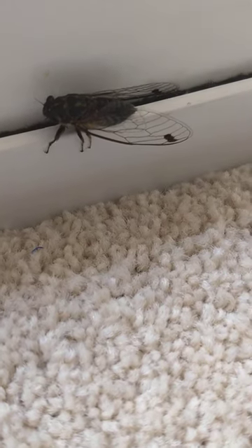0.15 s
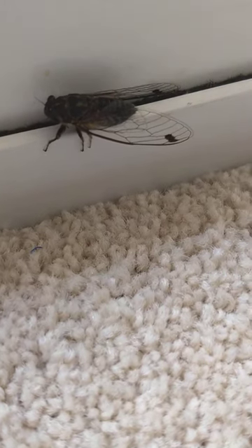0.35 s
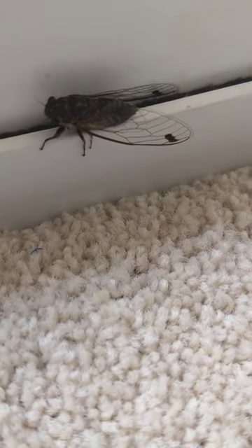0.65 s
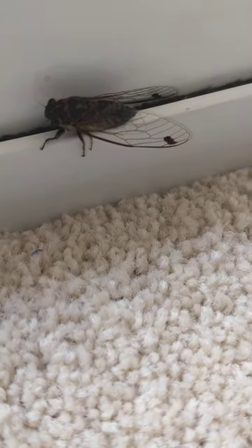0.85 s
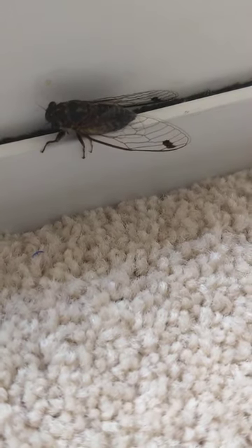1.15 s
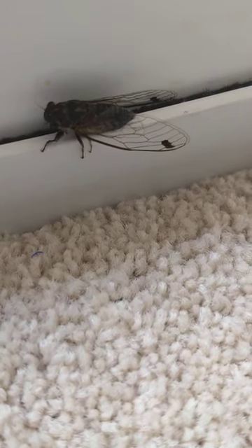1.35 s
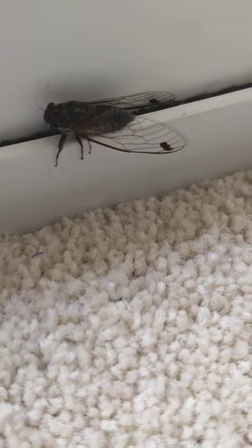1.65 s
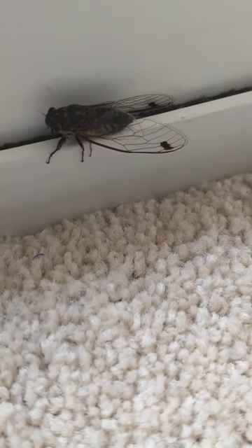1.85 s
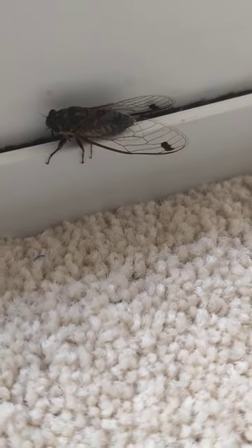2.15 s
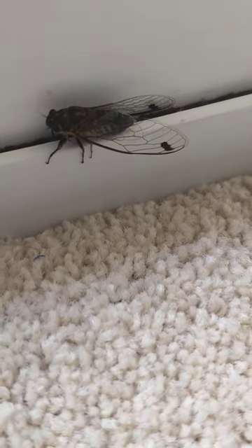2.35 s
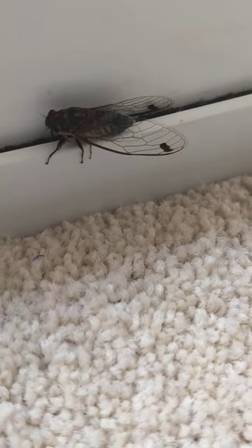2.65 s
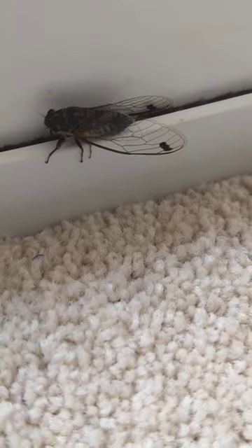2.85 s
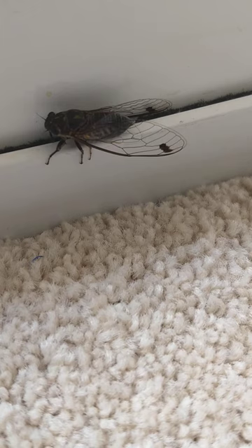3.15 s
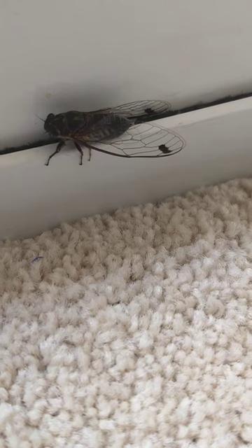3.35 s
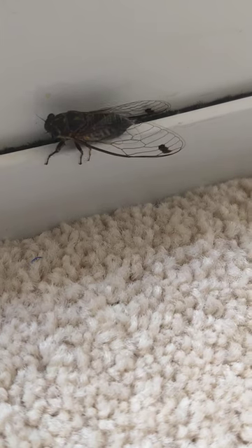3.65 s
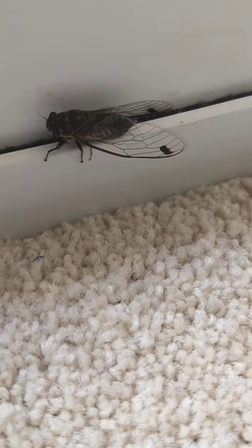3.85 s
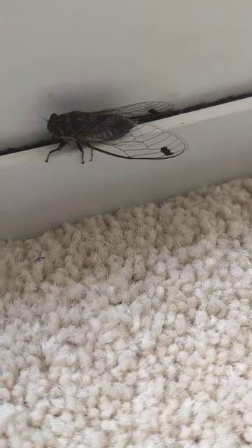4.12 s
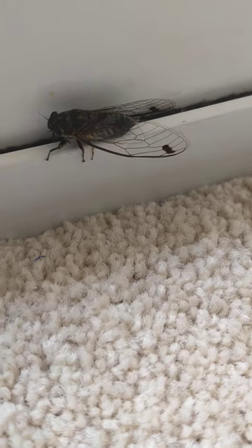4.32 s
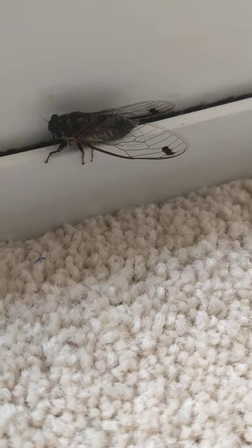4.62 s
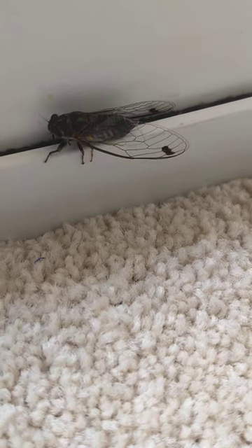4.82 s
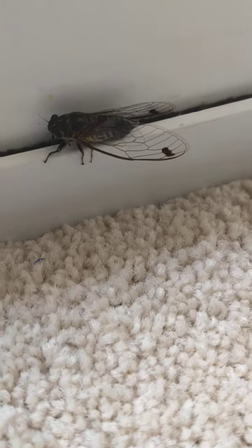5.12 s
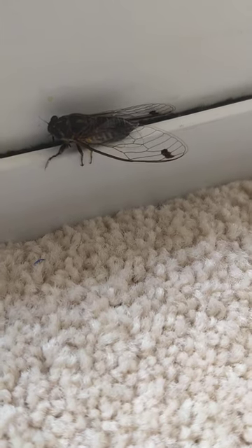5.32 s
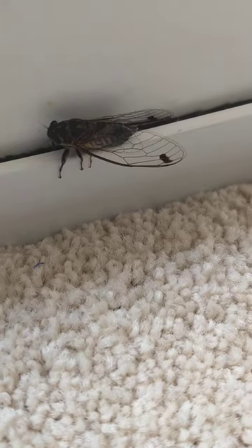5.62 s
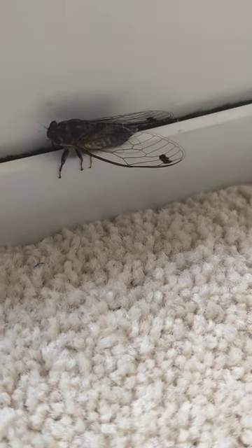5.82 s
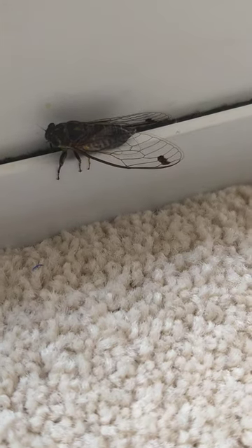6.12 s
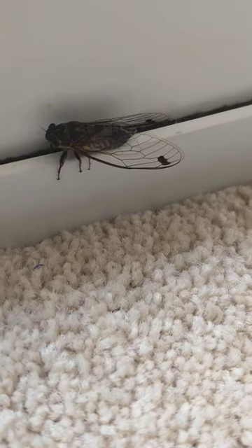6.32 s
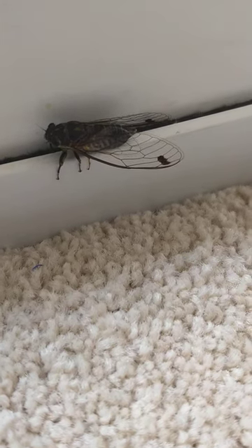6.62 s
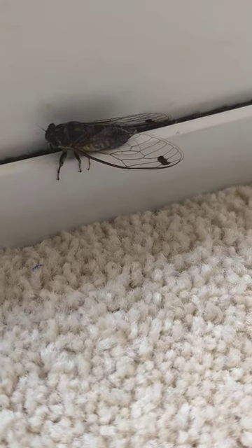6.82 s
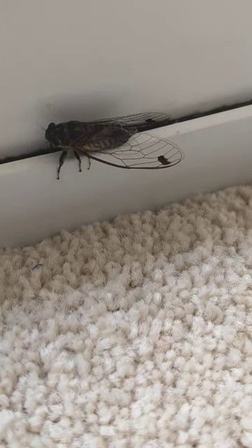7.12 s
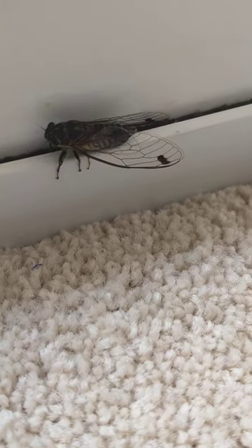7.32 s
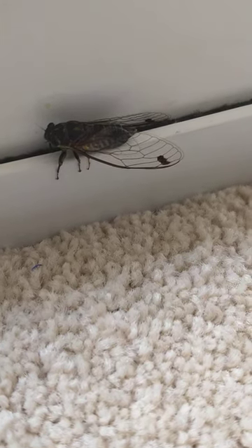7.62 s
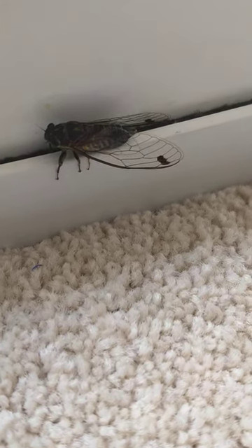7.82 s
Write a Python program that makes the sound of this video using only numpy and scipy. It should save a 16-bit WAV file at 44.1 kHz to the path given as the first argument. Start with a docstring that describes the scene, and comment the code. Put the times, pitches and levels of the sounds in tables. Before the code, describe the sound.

A single cicada sings very close to the microphone in a quiet carpeted room. It begins as a high, dry, slightly uneven rattle of rapid clicks, then gradually speeds up and grows louder, settling into a piercing, steady buzz that never pauses. Soft house noise and a faint hum lie behind it, with one soft low bump at the start and a brief, faint, distant whistle midway.

```python
"""A cicada sings on a skirting board in a quiet carpeted room, a hand's width from a two-port microphone.
Each muscle stroke buckles the ribs of its tymbals (two small drum skins), a click for each rib, and the
clicks ring its hollow abdomen. The strokes start slow and uneven, then grow faster, louder and steadier,
and a third pair of ribs joins in. Behind it are soft house noise, a hum, one bump and a far whistle."""
import sys
import numpy as np
from scipy import signal
from scipy.fft import rfft, irfft, next_fast_len
from scipy.io import wavfile
from scipy.ndimage import uniform_filter1d

SR = 44100
rng = np.random.default_rng(int(sys.argv[2]) if len(sys.argv) > 2 else 0)


def to_wav(sig):
    """Store sig (one row per channel, or 1-D mono) as 16-bit WAV at the path in sys.argv[1].

    Samples outside -1..1 are clipped; the rate is SR.
    """
    pcm = np.clip(np.atleast_2d(sig), -1, 1) * 32767
    pcm = np.round(pcm).astype(np.int16)
    wavfile.write(sys.argv[1], SR, pcm.T)  # frames by channels


N = 351477
TIME = np.arange(N) / SR
# the song's three paces: (slow [strokes/s], brisk [strokes/s], full [strokes/s])
PACES = [47, 68, 93]


def amp(db):
    """Turns decibels into a gain."""
    return 10 ** (np.asarray(db) / 20)


def unit(x):
    """Scales a signal to an average (rms) level of 1."""
    return x / np.sqrt(np.mean(x ** 2) + 1e-20)


def curve(rows, t):
    """Reads (time, value) rows at the times t."""
    return np.interp(t, *np.transpose(rows))


def spectrum(rows, hz):
    """Reads (frequency, value) rows on a log-frequency axis."""
    row_hz, value = np.transpose(rows)
    return np.interp(np.log(hz + 1), np.log(row_hz), value)


def prompt_response(gain):
    """The quickest response to a tap that has this gain at each frequency."""
    log_gain = np.log(np.maximum(np.r_[gain, gain[-2:0:-1]], 1e-5))
    return np.fft.ifft(np.exp(np.conj(signal.hilbert(log_gain)))).real


def clicks(times, sizes, reach=8):
    """Sharp taps, each at its exact time, even between samples."""
    at = np.floor(times * SR).astype(int)[:, None] + np.arange(-reach, reach + 1)
    offset = at - times[:, None] * SR
    shape = sizes[:, None] * np.sinc(offset) * np.cos(np.pi * offset / (2 * reach + 2)) ** 2
    inside = (at >= 0) & (at < N)
    return np.bincount(at[inside], shape[inside], N)


def room_tone(level_db=-52, rumble_hz=260, lean_db=1):
    """Soft noise of the house, partly alike at the two ports; its rumble leans to the left."""
    # colour of the noise: (frequency [Hz], relative level [dB])
    colour = [(28, -67), (40, -22), (49, 2.5), (60, -4), (78, 1.5), (105, -5), (220, -11), (420, -16.5),
              (760, -14.5), (1030, -13), (1250, -20), (1500, -22.5), (2700, -26.5), (4000, -41.5),
              (8000, -27), (12000, -74), (16000, -54)]
    # how alike the ports are: (frequency [Hz], likeness [1 = same, -1 = opposite])
    likeness = [(120, -0.16), (300, 0.43), (600, 0.86), (1050, 1), (1450, 0.87), (1900, -0.81),
                (2300, -1.055), (2700, -0.997), (3300, 1), (4500, 0.75), (6000, -0.0023)]
    # the rumble swells a little, then fades: (time [s], gain [dB])
    rumble_levels = [(0, -2), (2.5, -1.5), (5.7, -0.5), (7.97, -3.5)]
    size = next_fast_len(N)
    hz = np.fft.rfftfreq(size, 1 / SR)
    alike = np.clip(spectrum(likeness, hz), -1, 1)
    noise = rfft(rng.standard_normal((2, size))) * amp(spectrum(colour, hz))
    mid, side = noise * np.sqrt([1 + alike, 1 - alike])
    air = amp(level_db) * unit(irfft(np.array([mid + side, mid - side]), size)[:, :N])
    rumble = signal.sosfilt(signal.butter(2, rumble_hz, fs=SR, output="sos"), air)
    rumble_gain = amp(curve(rumble_levels, TIME) + np.array([[lean_db], [-lean_db]]))
    return air + rumble * (rumble_gain - 1)


def house_hum():
    """The house hums faintly with a few wavering tones."""
    # the tones: (pitch [Hz], level [dB])
    tones = [(76.3, -69), (266.7, -69), (311.1, -71.5)]
    hum = np.zeros((2, N))
    for hz, db in tones:
        drift = np.cumsum(rng.standard_normal((2, N)), axis=1) * 3 / np.sqrt(SR)
        hum += amp(db) * np.sqrt(2) * np.sin(2 * np.pi * hz * TIME + drift)
    return hum


def far_whistle(waver_hz=14):
    """A faint, far whistle whose wavering pitch rises and falls."""
    # its path: (time [s], pitch [Hz], level [dB])
    path = [(3.95, 740, -76), (4.0, 754, -57), (4.06, 780, -59), (4.13, 793, -50.5), (4.18, 810, -66),
            (4.24, 770, -85)]
    times, hz, db = np.transpose(path)
    waver = waver_hz * unit(uniform_filter1d(rng.standard_normal(N), 400))
    pitch = np.interp(TIME, times, hz) + waver
    loudness = amp(np.interp(TIME, times, db)) * (TIME > times[0]) * (TIME < times[-1])
    return loudness * np.sin(2 * np.pi * np.cumsum(pitch) / SR)


def soft_bump():
    """One soft bump: three low tones that swell and die quickly."""
    # the tones: (start [s], pitch [Hz], level [dB], decay [s])
    tones = [(0.226, 90, -45, 0.0099), (0.231, 129, -40.5, 0.0096), (0.24, 205, -50, 0.0073)]
    bump = np.zeros(N)
    for start, hz, db, decay in tones:
        age = np.maximum(TIME - start, 0)
        bump += amp(db) * 2 * age / decay * np.exp(-age / decay) * np.sin(2 * np.pi * hz * age)
    return bump


def high_hiss(song, level_db=-32.0, follow_s=0.002, enter_s=4.63, fade_s=0.11):
    """A faint, high hiss follows the song's loudness from about 4.6 s on."""
    # colour of the hiss: (frequency [Hz], relative level [dB])
    colour = [(11000, -70.5), (12300, -22), (13200, -4.5), (14300, 6), (15500, -1.5), (16200, 4)]
    step = 1 / (follow_s * SR)
    loudness = np.sqrt(abs(signal.lfilter([step], [1, step - 1], song ** 2)))
    size = next_fast_len(N)
    gain = amp(spectrum(colour, np.fft.rfftfreq(size, 1 / SR)))
    hiss = irfft(rfft(rng.standard_normal((2, size))) * gain, size)[:, :N]
    fade_in = np.clip((TIME - enter_s) / fade_s + .5, 0, 1)
    return amp(level_db) * loudness * fade_in * unit(hiss)


def faint_ticks(taps, hz, pitch_hz=4050, width_hz=1300):
    """A faint tick near 4 kHz comes with each click and does not grow as the song swells."""
    tick = prompt_response(1 / (1 + (2 * (hz - pitch_hz) / width_hz) ** 2))
    return signal.oaconvolve(taps, tick / abs(tick).max())[:N]


def reflections(sound, fade_s, level_db, gap_s=0.0018):
    """Dense echoes, different at each port, that die away by 60 dB in fade_s."""
    t = np.arange(SR // 4) / SR
    echoes = rng.standard_normal((2, len(t))) * np.exp(-np.log(1000) * t / fade_s) * (t > gap_s)
    echoes /= np.linalg.norm(echoes, axis=1, keepdims=True)
    return amp(level_db) * signal.fftconvolve(sound[None], echoes, axes=1)[:, :N]


def ports(song, lag_ms=.436):
    """The microphone's right port (opening) hears each click later than the left, and upside down."""
    # right port against left, for the cicada's direction: (frequency [Hz], gain [dB])
    right_colour = [(3500, 1), (4600, -2.5), (5500, 0), (6700, 3), (7500, -0.8), (8600, -3), (9800, -4),
                    (10600, -3.5), (11500, 0)]
    size = next_fast_len(N)
    hz = np.fft.rfftfreq(size, 1 / SR)
    delay = np.exp(-2j * np.pi * hz * lag_ms / 1000)
    left = rfft(song, size)
    right = -left * amp(spectrum(right_colour, hz)) * delay
    return irfft(np.array([left, right]), size)[:, :N]


def dry_snaps(taps, hz, level_db=-42.5, decay_s=0.00022):
    """Each buckling rib snaps with a tiny burst of noise."""
    # colour of a snap: (frequency [Hz], gain [dB])
    colour = [(2800, -18), (4500, 4), (7000, -9), (9000, 9), (11000, 13.5), (12500, 3.5), (15500, -4.5),
              (16500, -13)]
    loudness = signal.lfilter([1], [1, -np.exp(-1 / (decay_s * SR))], taps)
    bursts = loudness * rng.standard_normal((2, N))
    response = np.fft.fftshift(irfft(amp(level_db + spectrum(colour, hz))))
    return signal.oaconvolve(bursts, response[None], "same")


def abdomen(rib_clicks, hz, sac_db=2.5, sac_hz=8400, sac_width_hz=430, top_hz=12600):
    """The hollow abdomen rings up to top_hz; its air sac adds one narrow, piercing peak."""
    # colour of the abdomen: (frequency [Hz], gain [dB])
    colour = [(1800, -27.5), (3000, -3), (4300, 4.5), (5000, -2.5), (5800, 9.5), (6600, -1.5), (7300, 4),
              (8300, -2), (8850, -0.5), (9300, 1.5), (10000, 0.5), (10700, -1.5), (11400, -3), (13000, -11),
              (16000, 23)]
    sac = sac_db / (1 + (2 * (hz - sac_hz) / sac_width_hz) ** 2)
    ringing = signal.oaconvolve(rib_clicks, prompt_response(amp(spectrum(colour, hz) + sac)))[:N]
    return signal.sosfilt(signal.butter(6, top_hz, fs=SR, output="sos"), ringing)


def rib_chirps(times, sizes, ring_hz, length_s, glide_hz, skew=0.89, swell=1.2):
    """A rib swells, rings for a few cycles and dies; a positive glide lifts its pitch as it stiffens."""
    at = np.ceil(times * SR).astype(int)[:, None] + np.arange(128)
    age = at / SR - times[:, None]
    progress = np.clip(age / length_s[:, None], 0, 1)
    cycles = age * (ring_hz[:, None] + np.reshape(glide_hz, (-1, 1)) * (progress - 1) / 2)
    loudness = sizes[:, None] * abs(np.sin(np.pi * progress ** skew)) ** swell
    wave = loudness * np.sin(2 * np.pi * cycles)
    inside = (at >= 0) & (at < N)
    return np.bincount(at[inside], wave[inside], N)


def muscle_strokes(scatter_ms=.55, settle_pace=27, force_spread_db=.35):
    """The start, pace and strength of each muscle stroke: the faster, the steadier."""
    # the muscle's pace, which drives the song: (time [s], pace [strokes/s])
    stroke_rate = [(0.0, 47.6), (0.35, 44.8), (0.7, 50.85), (1.0, 49.53), (1.35, 53.9), (1.8, 58.8),
                   (2.4, 55.42), (2.65, 65.16), (3.3, 66.54), (3.6, 71.12), (4.2, 74.71), (4.6, 75.98),
                   (4.9, 80.76), (5.4, 83.58), (5.9, 87.72), (6.4, 90.56), (7.1, 92.35), (7.97, 93.6)]
    # each stumble shifts all later strokes: (time [s], delay [ms, negative = jumps ahead])
    stumbles = [(0.124, 4.0), (0.235, 2.2), (0.348, 2.3), (0.373, 3.8), (0.549, 4.2), (0.573, 3.3),
                (0.677, 4.1), (0.799, 4.1), (0.823, 2.4), (0.845, 2.5), (0.907, 1.1), (1.087, -2.9),
                (1.145, 1.5), (1.278, -3.8), (1.314, 2.1), (1.5, 2.0), (1.609, 1.8), (1.629, 2.5),
                (1.77, 2.7), (1.842, 5.5), (1.897, 2.8), (1.917, 3.2), (2.13, 2.8), (2.22, 2.5),
                (2.294, 2.3), (2.474, 2.6), (2.559, 2.1), (2.61, 1.9), (2.721, 5.8), (3.547, -3.2),
                (3.645, 2.4), (3.691, 4.1), (3.75, 2.5), (3.849, 2.9), (4.044, 2.6), (4.126, 1.5),
                (4.196, 2.2), (4.369, -2.3), (5.145, 1.5), (5.292, 0.9)]
    # strength of the strokes: (time [s], level [dB])
    effort = [(0, -24.5), (.12, -23.3), (.5, -23), (.9, -22), (1.35, -19.5), (1.85, -17), (2.35, -16.5),
              (3.05, -12.5), (3.5, -11), (4.3, -8.2), (5.05, -7.5), (6.05, -5.5), (7.25, -4), (7.97, -4)]
    count = np.cumsum(curve(stroke_rate, TIME)) / SR - 1 / 4
    for when, late_ms in stumbles:
        count -= (TIME > when) * curve(stroke_rate, when) * late_ms / 1000
    starts = np.interp(np.arange(int(count[-1]) + 1), np.maximum.accumulate(count), TIME)
    pace = curve(stroke_rate, starts)
    scatter, force = np.clip(rng.standard_normal((len(starts), 2)), -2, 2).T
    shaky = np.exp(-((pace - PACES[0]) / settle_pace) ** 2)
    effort_db = curve(effort, starts) + force_spread_db * force
    return starts + shaky * scatter_ms * scatter / 1000, pace, effort_db


def tymbals(join_s=3.8, full_join_s=4.63, lock_pace=79, lock_span=3, locked_share=.35, limp_ms=.07,
            length_spread=.035, click_spread_db=.5, snap_growth=0.64, snap_spread_db=7.5,
            rebound_db=-14, rebound_s=0.0007255, rebound_hz=8700, rebound_length_s=0.00059,
            tick_db=-50, tick_spread_db=4):
    """Each stroke buckles the ribs in turn; returns the ringing song and its dry snaps."""
    # a row for each rib: (delay when slow, brisk, full [ms], length when slow, brisk, full [ms],
    # random slip [ms], extra delay when the last two ribs join [ms], pitch spread [Hz])
    ribs = [(0, 0, 0, .92, .88, .7, .01, 0, 40), (1.88, 1.88, 2.06, 1.15, 1, .8, .025, 0, 40),
            (6.15, 6.15, 6.3, .8, .55, .48, .025, .15, 450),
            (7.35, 7.42, 7.98, 1.5, 1.3, .86, .035, .35, 50), (4.5, 4.5, 3.7, .95, .95, .8, .07, 0, 150),
            (6.1, 6.1, 5.2, .85, .85, .75, .07, 0, 150)]
    # how each rib rings: (pitch when slow, brisk, full [Hz], level when slow, brisk, full [dB])
    rings = [(8060, 8690, 8870, -0.9, 0.5, 0), (8310, 8990, 8880, 1.5, 1.4, 0.7),
             (8560, 8610, 9550, 6.5, 1.5, -3.5), (8310, 8400, 8850, 2, 0.16, 1.5),
             (8800, 8400, 9030, -6, -4, -3), (8700, 8860, 8960, -5, -4, 0.5)]
    # rise of pitch within one click: (slow [Hz], brisk [Hz], full [Hz])
    glides = [1270, 1490, 1360]
    starts, pace, effort_db = muscle_strokes()
    number = np.arange(len(starts))
    chance = np.clip(rng.standard_normal((len(starts), len(ribs), 7)), -2.5, 2.5).transpose(1, 2, 0)
    # the last two ribs buckle on every other stroke, then on every stroke
    joined = (starts > full_join_s) | ((starts > join_s) & (number % 2 == 0))
    # around lock_pace the ribs lock into an even buzz, keeping only a share of their unevenness
    unsteady = locked_share + (1 - locked_share) / (1 + np.exp((pace - lock_pace) / lock_span))
    rib_clicks, snap_taps, tick_taps = np.zeros((3, N))
    for k, (rib, ring) in enumerate(zip(ribs, rings)):
        slip, detune, stretch, force, crack, bounce, tick = chance[k]
        slip_ms, push_ms, spread_hz = rib[6:]
        delay_ms = np.interp(pace, PACES, rib[:3]) + slip_ms * slip + push_ms * joined
        buckles = 1
        if k >= len(ribs) - 2:
            buckles = joined
            delay_ms += limp_ms * (-1) ** number  # late and early by turns
        times = starts + delay_ms / 1000
        length_s = np.interp(pace, PACES, rib[3:6]) * (1 + length_spread * stretch) / 1000
        # a rib that catches snaps higher, seldom lower
        detune_hz = spread_hz * unsteady * np.maximum(detune, -.3)
        ring_hz = np.interp(pace, PACES, ring[:3]) + detune_hz
        sizes = buckles * amp(effort_db + np.interp(pace, PACES, ring[3:]) + click_spread_db * force)
        rib_clicks += rib_chirps(times, sizes, ring_hz, length_s, np.interp(pace, PACES, glides))
        # the rib springs back, so each click has a weak second pulse
        rebounds = times + rebound_s * (1 + length_spread * bounce)
        rib_clicks += rib_chirps(rebounds, sizes * amp(rebound_db), rebound_hz + detune_hz,
                                 np.full(len(times), rebound_length_s), glide_hz=-600)
        snap_taps += clicks(times, sizes ** snap_growth * amp(snap_spread_db * unsteady * crack))
        tick_taps += clicks(times, buckles * amp(tick_db + tick_spread_db * unsteady * tick))
    hz = np.fft.rfftfreq(1024, 1 / SR)
    return abdomen(rib_clicks, hz) + faint_ticks(tick_taps, hz), dry_snaps(snap_taps, hz)


def scene(wall_s=0.00115, wall_db=-22, ring_hz=8300, ring_width_hz=800):
    """The cicada, its echo off the wall and its ring lingering in corner and room, over the house."""
    # the house noise and hum recede as the song swells: (time [s], gain [dB])
    house_levels = [(0, 0.96), (3, 0.1), (4.4, -0.4), (5.6, -0.94), (7.97, -2)]
    song, snaps = tymbals()
    wall_delay = clicks(np.array([wall_s]), np.ones(1))[:SR // 100]
    wall = amp(wall_db) * signal.oaconvolve(song, wall_delay)[:N]
    ring = signal.lfilter(*signal.iirpeak(ring_hz, ring_hz / ring_width_hz, fs=SR), song)
    corner = reflections(ring, fade_s=0.022, level_db=-20.5, gap_s=0.0005)
    room = reflections(ring, fade_s=0.13, level_db=-25.5)
    cicada = ports(song + wall) + snaps
    hiss = high_hiss(song)
    house = (room_tone() + house_hum()) * amp(curve(house_levels, TIME))
    return cicada + corner + room + hiss + house + far_whistle() + soft_bump()


def record(dry):
    """The level steps down now and then as the song swells, and the highest treble is cut off."""
    # the steps, which add up: (time [s], change in level [dB])
    steps = [(3.12, -1.7), (3.55, -2), (4.32, -1.3), (6.08, -1.9), (7.29, -1.5)]
    step_s, top_hz = 0.0043, 16200
    level_db = sum(db * np.clip((TIME - when) / step_s, 0, 1) for when, db in steps)
    low_pass = signal.firwin(255, top_hz, window=("kaiser", 9), fs=SR)
    return signal.oaconvolve(dry * amp(level_db), low_pass[None], "same")


dry = scene()
out = record(dry)
to_wav(out)
```